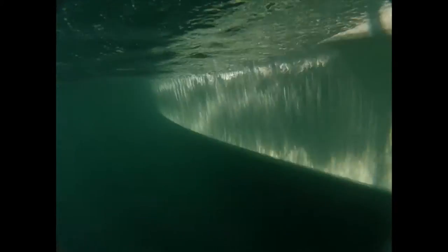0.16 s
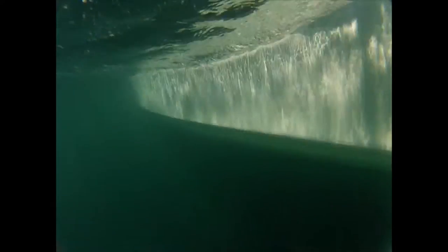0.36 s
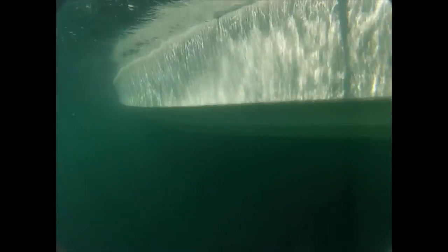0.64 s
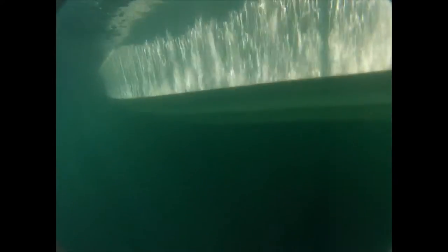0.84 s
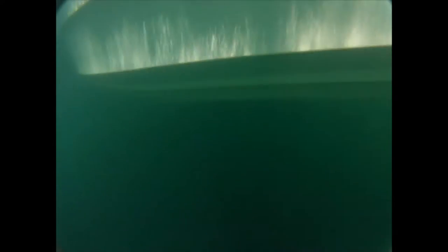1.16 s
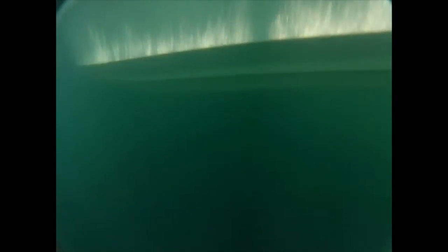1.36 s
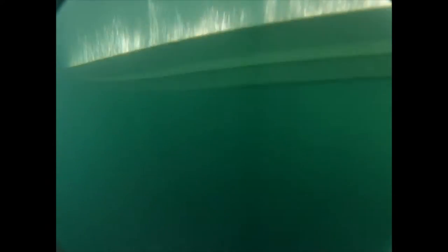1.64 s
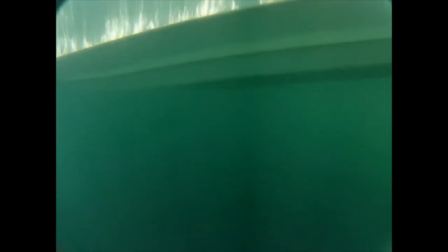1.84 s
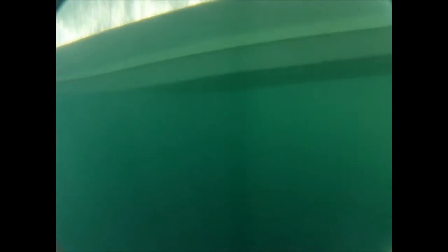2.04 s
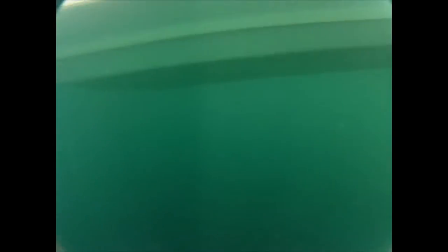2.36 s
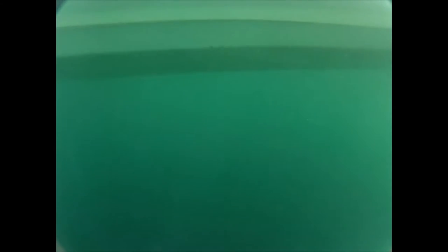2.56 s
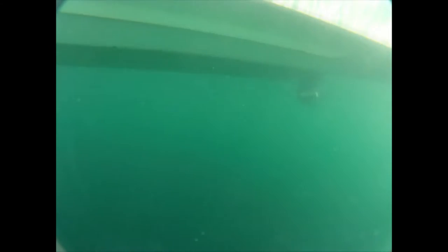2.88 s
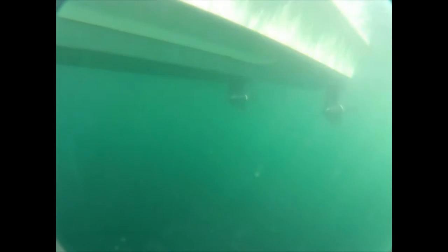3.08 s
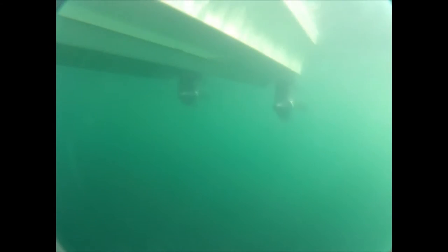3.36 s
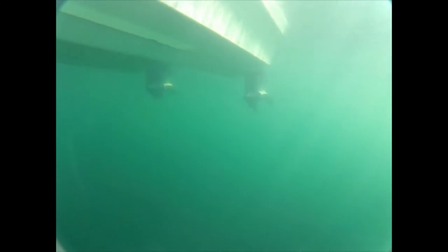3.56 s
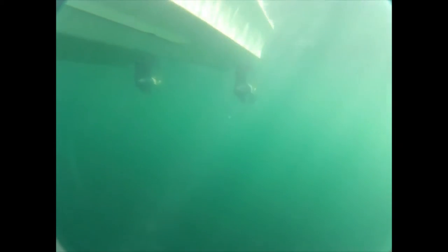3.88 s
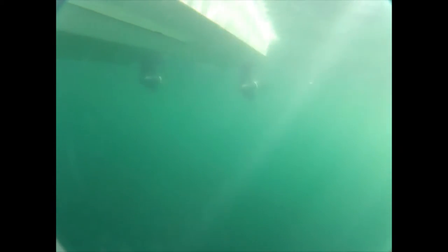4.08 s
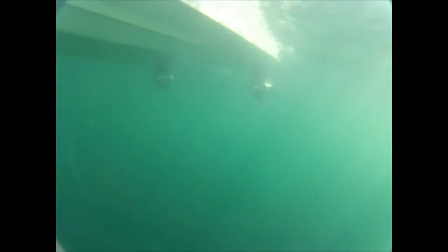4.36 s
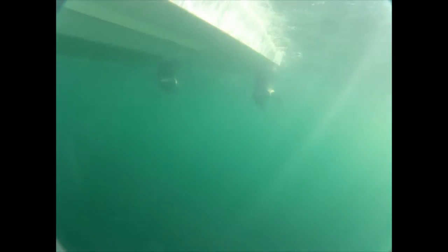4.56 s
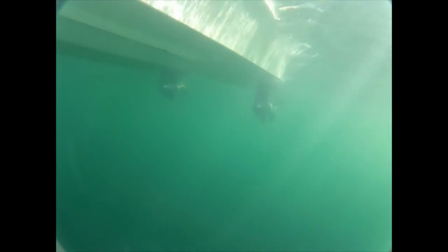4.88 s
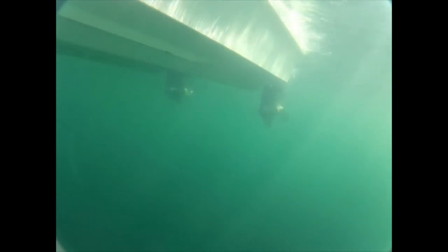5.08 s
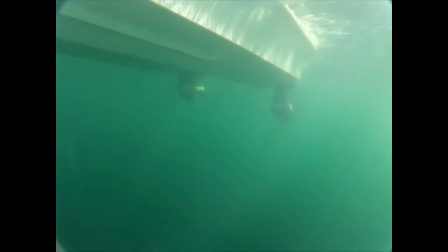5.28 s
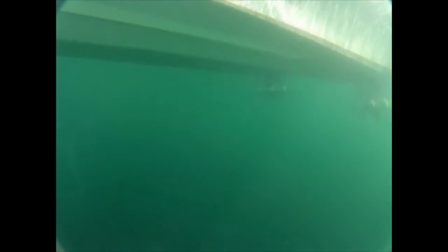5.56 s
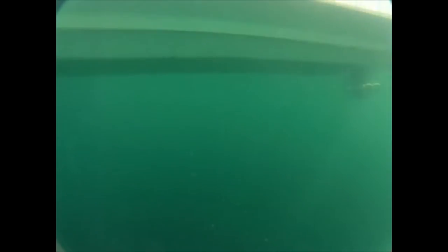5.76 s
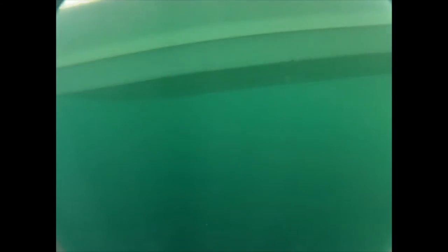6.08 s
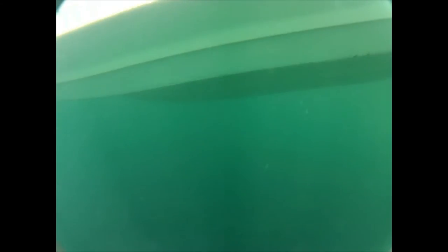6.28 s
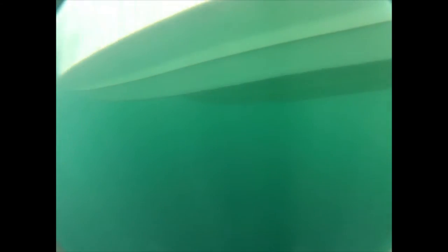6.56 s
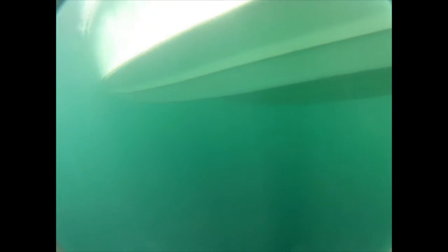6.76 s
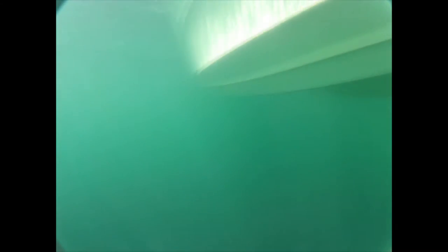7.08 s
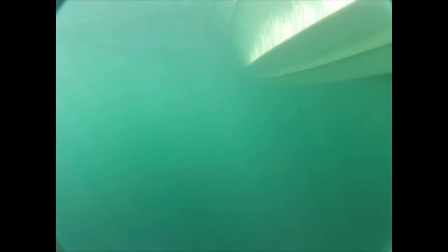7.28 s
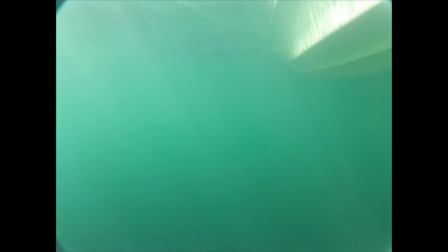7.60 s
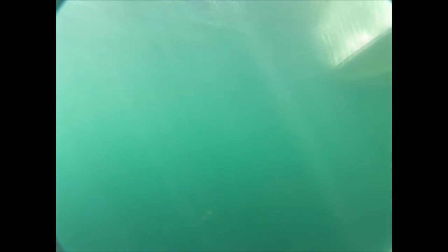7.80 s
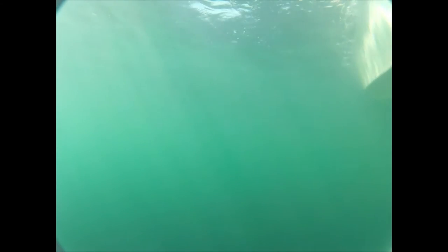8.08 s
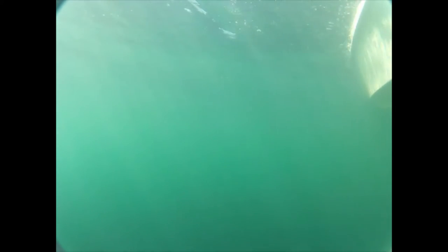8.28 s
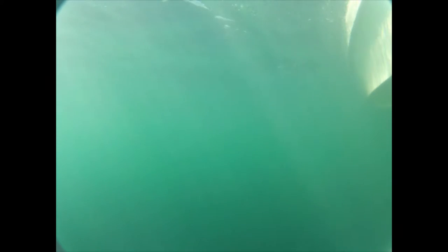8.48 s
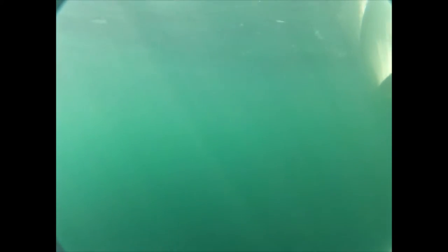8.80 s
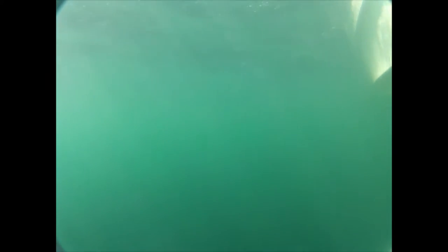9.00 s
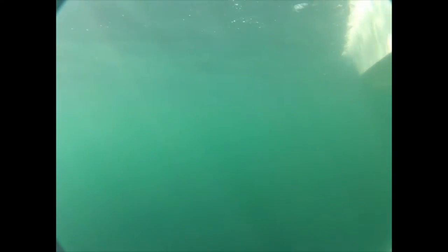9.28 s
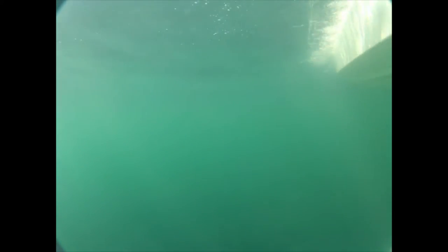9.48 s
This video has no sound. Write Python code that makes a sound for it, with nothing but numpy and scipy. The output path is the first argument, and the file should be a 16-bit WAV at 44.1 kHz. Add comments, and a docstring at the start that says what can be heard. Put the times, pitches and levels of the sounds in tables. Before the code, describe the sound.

Heard from inside a sealed waterproof case: a brief patter of spray, then a plunge with low glugs, knocks and a loud cluster of popping, chirping bubbles in the first second. After that, muffled water churns on the hollow case in uneven sloshes over low buffeting, with faint ticks from a loose mount. A second strong gulp comes near three seconds; later only scattered gurgles and soft surges remain.

```python
"""Spray pelts a waterproof camera housing, then it splashes under beside a moving boat and is dragged along.
Trapped air slaps, gulps and bubbles off it: falling throbs, knocks on the case and dying, gliding sines.
Then water churns on the hollow case as ringing grains of noise, with low buffeting, gurgles and fizz.
A loose part of the mount ticks, and the mount strums once. One microphone hears it all through the case;
the mono recorder mirrors the sound faintly around 12 kHz."""
import sys
import numpy as np
from scipy import signal
from scipy.io import wavfile

SR = 44100
rng = np.random.default_rng(int(sys.argv[2]) if len(sys.argv) > 2 else 0)


def generate_wav(sig):
    """Save sig (samples, or channels by samples) to the path in sys.argv[1] as 16-bit PCM at SR."""
    pcm = np.round(np.clip(np.atleast_2d(sig).T, -1, 1) * 32767).astype(np.int16)
    wavfile.write(sys.argv[1], SR, pcm)


N = 425124

# single bubbles leaving the case: (time [s], peak level [dB], pitch [Hz], 60 dB decay [s])
SINGLE_BUBBLES = [(.111, -19.5, 1290, 0.015), (.114, -22.5, 400, 0.13), (.181, -23.5, 2180, 0.022),
                  (.19, -18.5, 511, 0.076), (.187, -28, 1195, 0.058), (.301, -29, 3390, 0.015),
                  (.374, -18.5, 850, 0.022), (.626, -23.5, 1910, 0.018), (.674, -25.5, 1630, 0.035),
                  (.697, -27, 2080, .018), (.731, -28.5, 3030, 0.023), (.761, -8.5, 1260, 0.041),
                  (.777, -20, 2060, 0.013), (.792, -20.5, 2030, 0.015), (.831, -24, 2050, 0.012),
                  (.858, -18, 2080, 0.014), (.886, -17, 1900, 0.014), (0.9023, 1.5, 1204, 0.006),
                  (.908, -20, 1430, 0.026), (.938, -5, 1755, 0.028), (.965, -16, 4280, 0.0045),
                  (.969, -13, 2490, 0.012), (1.009, -32, 2400, 0.024), (1.039, -29, 1950, 0.038),
                  (1.129, -28, 1250, 0.0076), (1.768, -22, 2030, 0.0029), (1.88, -30.5, 1280, .02),
                  (1.881, -26.5, 608, 0.034), (2.654, -20.5, 546, 0.078), (2.767, -12, 576, 0.09),
                  (2.778, -7, 570, 0.059), (2.784, -28, 2050, 0.02), (2.853, -19, 620, 0.035),
                  (2.873, -32.5, 3580, 0.031), (3.471, -27.5, 860, 0.018), (3.471, -24, 2180, 0.0024),
                  (3.645, -22.5, 594, 0.05), (3.891, -32, 2150, 0.017), (4.402, -24.5, 607, 0.06),
                  (4.885, -37, 2170, 0.016), (5.175, -31.5, 2190, 0.01), (5.245, -33.5, 1440, 0.019),
                  (6.632, -33.5, 2174, 0.018), (6.657, -13, 565, 0.066), (8.284, -29, 2290, 0.021),
                  (8.393, -29, 545, 0.13)]
# large air pockets slapping shut on the case:
# (time [s], throb level [dB], final throb pitch [Hz], knock level [dB])
AIR_POCKETS = [(0.325, -24, 66.4, -29), (0.477, -13.5, 69, -20.5), (0.574, -10.5, 62, -10.5),
               (.608, -12.5, 61, -12), (.728, -11.5, 62.3, -8), (2.939, -5, 59.6, -8),
               (3.0408, -10.5, 54.6, -20), (3.0602, -11, 53.7, -21), (3.123, -14.5, 62, -30)]
BUBBLE_SWELL_CYCLES = 0.8   # a bubble takes part of a cycle to start ringing


def from_db(db):
    """Decibels to amplitude."""
    return 10 ** (np.asarray(db) / 20)


def rms_one(x):
    """Scale to rms 1."""
    return x / np.sqrt(np.mean(x ** 2) + 1e-20)


def in_time(rows):
    """The columns of a curve, at every sample."""
    s, *columns = np.transpose(rows)
    return [np.interp(np.arange(N) / SR, s, column) for column in columns]


def at_hz(colour, hz):
    """Gain of a colour at one frequency."""
    f, db = np.transpose(colour)
    return from_db(np.interp(np.log(hz), np.log(f), db))


def cut(x, hz, kind, order=2):
    """Butterworth filter."""
    sos = signal.butter(order, np.clip(hz, 10, 0.45 * SR), kind, fs=SR, output="sos")
    return signal.sosfilt(sos, x + 1e-18)


def drift(rate_hz):
    """Slow chance with spread 1: noise through two equal poles, made at every 40th sample."""
    r = np.exp(-80 * np.pi * rate_hz / SR)
    white = rng.standard_normal(N // 40 + 2002)
    slow = signal.lfilter([1], [1, -2 * r, r * r], white)[2000:]   # settled part only
    return np.interp(np.arange(N) / 40, np.arange(len(slow)), rms_one(slow))


def resonate(x, hz, width_hz):
    """A resonance with gain 1 on top."""
    r = np.exp(-np.pi * width_hz / SR)
    numerator = np.array([1, 0, -1]) * (1 - r * r) / 2
    return signal.lfilter(numerator, [1, -2 * r * np.cos(2 * np.pi * hz / SR), r * r], x + 1e-18)


def ping(hz, t60, rise=0, swell_cycles=0.1):
    """A dying sine that swells over some cycles and glides upward by rise [octaves/s]."""
    t = np.arange(int(1.5 * t60 * SR) + 2) / SR
    turns = np.cumsum(hz * 2 ** (rise * t)) / SR
    onset = 1 - np.exp(-turns / swell_cycles)
    return np.sin(2 * np.pi * turns) * from_db(-60 * t / t60) * onset


def add(track, s, sound):
    """Mix a sound in at a time."""
    i = int(np.clip(round(s * SR), 0, N - 1))
    track[i:i + len(sound)] += sound[:N - i]


def swell(start_s, length_s, attack_s, release_s):
    """Attack, hold and release of one event, at every sample."""
    out = np.zeros(N)
    t = np.arange(int((length_s + 8 * release_s) * SR)) / SR
    release = np.exp(-np.maximum(t - length_s, 0) / release_s)
    add(out, start_s, (1 - np.exp(-t / attack_s)) * release)
    return out


def surges(per_s=45, fade_s=0.0066, spread_db=11.5, calm=0.14):
    """Water lets go in little spurts that start at once and fade."""
    sizes = rng.random(N) < per_s / SR
    kicks = sizes * from_db(spread_db * np.clip(rng.standard_normal(N), -2, 2))
    return calm + signal.lfilter([1], [1, -np.exp(-1 / (fade_s * SR))], kicks + 1e-18)


def grains(colour, per_s, spread_db, sharpness, clumping, count=20):
    """Random collapses, in spurts, each ringing briefly at one of many pitches; rms 1."""
    at = np.flatnonzero(rng.random(N) < per_s / SR)
    sizes = from_db(spread_db * np.minimum(rng.exponential(1, len(at)), np.pi))
    sizes = sizes * surges()[at] ** clumping * rng.choice([-1, 1], len(at))
    dealt = rng.integers(0, count, len(at))   # the pitch that each collapse gets
    out = np.zeros(N)
    for k, hz in enumerate(np.geomspace(colour[0][0], colour[-1][0], count)):
        clicks = np.zeros(N)
        clicks[at[dealt == k]] = sizes[dealt == k]
        ringing = resonate(resonate(clicks, hz, hz / sharpness), hz, hz / 2)
        out += at_hz(colour, hz) * np.sqrt(hz) * rms_one(ringing)   # sqrt: bands widen with pitch
    return rms_one(out)


def smooth_noise(colour, count=8):
    """Even noise in adjoining bands; rms 1."""
    edges = np.geomspace(colour[0][0], colour[-1][0], count + 1)
    out = np.zeros(N)
    for lo, hi in zip(edges, edges[1:]):
        band = cut(rng.standard_normal(N), [lo, hi], "band")
        out += at_hz(colour, np.sqrt(lo * hi)) * band
    return rms_one(out)


def housing(x, boom):
    """The air in the case booms with whatever pushes on its walls; water pressure wavers its pitch."""
    air_hz, width_hz, wander_hz, wanders_per_s = 570, 33, 29.4, 5.6
    hz = air_hz + wander_hz * drift(wanders_per_s)[:len(x)]
    turning = np.exp(2j * np.pi * np.cumsum(hz) / SR)
    r = np.exp(-np.pi * width_hz / SR)
    # shift the wavering pitch down to zero, low-pass there, and shift back
    boomed = turning * signal.lfilter([1 - r], [1, -r], x / turning)
    return x + boom * 2 * np.real(boomed)


def bubbles():
    """Each bubble pinches off and rings at the pitch of its size; near the surface the pitch glides upward."""
    out = np.zeros(N)
    for s, db, hz, t60 in SINGLE_BUBBLES:
        octaves_per_s = 7 * np.exp(-s / 1.3)   # the glide fades as the camera sinks
        tone = ping(hz, t60, octaves_per_s, swell_cycles=BUBBLE_SWELL_CYCLES)
        add(out, s, from_db(db) * tone / np.abs(tone).max())
    # the wall of a loud bubble swings unevenly
    return out + 0.027 * cut(out ** 2, 1800, "high")


def slaps():
    """A pocket of air shuts with a knock on the case; a large one then glugs, falling to a low throb."""
    # ringing of the case under a blow: (pitch [Hz], relative level [dB], 60 dB decay [s])
    case_modes = [(356, -2, 0.017), (570, 1, 0.022), (782, -8, 0.015)]
    # small pockets that only knock: (time [s], level [dB])
    small_pockets = [(2.507, -26), (2.526, -30), (2.549, -25), (2.578, -25.5), (2.906, -17.5), (3.017, -21)]
    throb_t60_s, drop_hz, drop_s = 0.19, 400, 0.003   # a throb starts high and falls as the pocket spreads
    out, t = np.zeros(N), np.arange(SR // 4) / SR
    for s, db, hz, _ in AIR_POCKETS:
        turns = hz * t + drop_hz * drop_s * (1 - np.exp(-t / drop_s))
        onset = 1 - np.exp(-2 * turns)
        add(out, s, from_db(db - 60 * t / throb_t60_s) * np.sin(2 * np.pi * turns) * onset)
    blows = [(s, knock_db) for s, _, _, knock_db in AIR_POCKETS] + list(small_pockets)
    chances_db = rng.standard_normal((len(blows), len(case_modes)))   # no two blows ring alike
    for (s, db), chance_db in zip(blows, chances_db):
        for (mode_hz, mode_db, t60), luck_db in zip(case_modes, chance_db):
            add(out, s, -from_db(db + mode_db + luck_db) * ping(mode_hz, t60, swell_cycles=0.27))
    return cut(out, 900, "low", order=3)   # water cushions the blow


def shower(count=100):
    """Small bubbles dragged down by the dive chirp in a crowd that thickens quickly and then thins out."""
    start_s, peak_s, end_s = 0.59, 0.65, 1.17
    level_db, spread_db = -37, 4
    middle_hz, spread_octaves, ring_cycles = 2150, 0.5, 26   # ring_cycles: until 60 dB down, before the glide
    out = np.zeros(N)
    times = rng.triangular(start_s, peak_s, end_s, count)
    chances = np.clip(rng.standard_normal((count, 2)), -2, 2)
    for s, (size, luck) in zip(times, chances):
        hz = middle_hz * 2 ** (spread_octaves * size)
        chirp = ping(hz, ring_cycles / hz, rise=5, swell_cycles=BUBBLE_SWELL_CYCLES)
        add(out, s, from_db(level_db + spread_db * luck) * chirp)
    return out


def spray(spraying):
    """Drops pelt the case as it meets the surface."""
    # colour of the spray: (frequency [Hz], relative level [dB])
    drop_colour = [(300, -5.5), (700, -8.5), (1300, -3.5), (1900, -1), (2800, -6), (3600, -3.5),
                   (5200, -15)]
    return spraying * grains(drop_colour, per_s=4600, spread_db=0.5, sharpness=3.2, clumping=0.35, count=14)


def water_motion():
    """Gains of buffet, churn, fizz, far fizz and spray: the current keeps up a wash, sloshes stir it."""
    # current on the case, as its low buffeting: (time [s], relative level [dB])
    current_curve = [(0, -43.5), (.5, -40.5), (.6, -36.5), (.88, -36), (1.3, -38), (2.3, -43), (2.4, -32),
                     (2.66, -38.5), (3, -23.5), (3.28, -37.5), (5.88, -44), (6.26, -55.5), (6.32, -32.5),
                     (7.2, -42.5), (7.28, -26.5), (7.5, -37), (8.44, -43.5), (8.5, -32.5), (8.78, -28),
                     (9.14, -44.5), (9.2, -33), (9.64, -36.5)]
    # wavelets sloshing over the case: (start [s], length [s], churn level [dB], fizz level [dB])
    wavelets = [(0.092, 0.094, -53, -48), (0.228, 0.16, -46.5, -51.5), (0.588, 0.08, -25.5, -40.5),
                (0.684, 0.11, -33.5, -37), (0.856, 0.12, -38, -40.5), (1.009, 0.17, -42, -47),
                (1.41, 0.072, -40.5, -49.5), (1.911, 0.03, -41, -55), (2.15, 0.17, -37, -54.5),
                (2.637, 0.021, -32, -35.5), (2.749, 0.18, -31, -48), (3.878, 0.061, -35.5, -47.5),
                (4.252, 0.036, -26, -42), (4.346, .11, -38, -66), (4.819, 0.14, -36, -49),
                (5.133, 0.15, -40, -56), (5.427, 0.022, -34.5, -52.5), (5.737, 0.097, -41.5, -62.5),
                (6.437, 0.055, -38.5, -70), (6.578, 0.059, -36.5, -48), (6.714, 0.026, -23.5, -38),
                (6.885, 0.17, -41, -66), (7.152, 0.093, -38.5, -58), (7.247, 0.13, -37, -54.5),
                (8.261, 0.096, -35, -59), (8.503, 0.12, -41, -54.5), (8.685, 0.088, -34.5, -52.5),
                (9.148, 0.11, -34, -53.5), (9.296, 0.075, -33, -48.5), (9.4, 0.14, -39, -61.5),
                (9.595, 0.037, -34.5, -55)]
    # spray on the case before it goes under: (start [s], length [s], level [dB])
    splats = [(0, 0.0049, -17), (0.013, 0.045, -26.5), (0.046, 0.0065, -19.5), (0.066, 0.0041, -20.5),
              (0.081, 0.0036, -28)]
    current_db, = in_time(current_curve)
    # the wash takes a share of the current's swing and has a rise and fall [dB] of its own
    wash_db = 0.4 * (current_db - current_db.mean()) + 3.5 * drift(2.7)
    churning, fizzing, spraying = np.zeros(N), np.zeros(N), np.zeros(N)
    attack_s = 0.011
    for s, length, churn_db, fizz_db in wavelets:
        release_s = 0.022 + 0.12 * length   # a longer slosh drains more slowly
        churning += from_db(churn_db) * swell(s, length, attack_s, release_s)
        fizzing += from_db(fizz_db) * swell(s, length, attack_s, 0.6 * release_s)   # fizz clears sooner
    for s, length, db in splats:
        spraying += from_db(db) * swell(s, length, attack_s=0.0013, release_s=0.005)
    # sloshes and spray push on the case too
    stirring = from_db(-8) * churning + from_db(-0.5) * spraying
    pushing = np.hypot(stirring, from_db(current_db - 2.5))
    churning = np.hypot(churning, from_db(-48.5 + wash_db))
    washing = from_db(-62.5 + 0.4 * wash_db)   # the fizz of the wash swings less
    return pushing, churning, fizzing, washing, spraying


def flow(pushing, churning, shield_db=-8, shield_s=0.0037):
    """Big eddies buffet the case, smaller ones churn on it, and the mount strums."""
    # colours of the low buffeting and of the churn: (frequency [Hz], relative level [dB])
    buffet_colour = [(18, -12.5), (30, -1.5), (52, 1), (75, -8), (110, -11), (160, -28)]
    churn_colour = [(100, 4), (180, 4), (260, 3.5), (350, 1), (440, -4.5), (540, -2.5), (630, 0), (760, -8),
                    (950, -28)]
    # a pocket of air keeps the moving water off the case around the moment that it shuts
    t = np.arange(N) / SR
    covers = [np.exp(-((t - s - shield_s / 2) / shield_s) ** 2) for s, *_ in AIR_POCKETS]
    wetted = from_db(shield_db * np.max(covers, axis=0))
    buffet = pushing * from_db(2 * drift(13.0)) * smooth_noise(buffet_colour, count=6)
    collapses = grains(churn_colour, per_s=900, spread_db=2.4, sharpness=17.8, clumping=0.43)
    churn = churning * rms_one(housing(collapses, boom=1.7))
    # the mount strums once, while the current is strong
    strumming = swell(start_s=8.46, length_s=0.43, attack_s=0.038, release_s=0.076)
    hum = resonate(resonate(rng.standard_normal(N), 174.5, 7.8), 190, 30)
    strum = from_db(-42) * strumming * rms_one(hum)
    return wetted * (buffet + churn) + strum


def eddies():
    """An eddy bursts on the case as a short, lumpy gurgle with a bright edge."""
    # bursts: (time [s], level [dB], centre [Hz], length [s])
    bursts = [(2.825, -30.5, 607, 0.086), (2.933, -18, 600, 0.011), (2.992, -29, 604, 0.052),
              (4.263, -26, 277, 0.026), (4.777, -33.5, 325, 0.027), (4.431, -31.5, 403, 0.0092),
              (6.317, -25.5, 195, 0.031), (6.72, -32.5, 536, 0.023), (6.787, -36, 182, 0.087),
              (7.353, -35.5, 274, 0.052), (8.022, -34, 285, 0.021), (8.278, -30, 264, 0.028),
              (8.699, -32.5, 455, 0.021), (9.322, -34.5, 390, 0.032)]
    out, t = np.zeros(N), np.arange(SR // 4) / SR
    noises = rng.standard_normal((len(bursts), 2, len(t)))
    for (s, db, hz, length), white in zip(bursts, noises):
        envelope = (1 - np.exp(-t / 0.0027)) * np.exp(-(t / length) ** 1.42)
        lumps = white * (np.abs(white) > 2)   # only the strongest pushes count
        gurgle = housing(cut(resonate(lumps[0], hz, 0.39 * hz), 590, "low", order=4), boom=1.0)
        edge = resonate(resonate(lumps[1], 1970, 480), 1270, 1330)
        burst = envelope * (rms_one(gurgle) + from_db(-33.0) * rms_one(edge))
        loudness = np.sqrt(np.sum(burst ** 2) / (length * SR))
        add(out, s, from_db(db) * burst / loudness)
    return out


def fizz(fizzing, washing, wake_db=-28, surface_db=9, wake_s=0.0059):
    """Fine bubbles drift past in clouds; each large bubble sheds a few more, most near the surface."""
    # colour of the fizz: (frequency [Hz], relative level [dB])
    fizz_colour = [(900, 2), (1150, 2), (1450, -9), (1800, 0.5), (2200, 4.5), (2700, -14.5), (3200, -10.5),
                   (3650, -6), (4200, -41.5), (5200, -24.5)]
    shed, t = np.zeros(N), np.arange(SR // 8) / SR
    for s, db, _, _ in SINGLE_BUBBLES:
        shed_db = min(db, -20) + wake_db + surface_db * np.exp(-s / 2)
        add(shed, s, from_db(shed_db) * np.exp(-t / wake_s))
    # the nearest bubbles ring one by one, the far ones merge into a wash
    near = grains(fizz_colour, per_s=1100, spread_db=2.0, sharpness=37, clumping=0.63, count=30)
    far = smooth_noise(fizz_colour, count=14)
    clouds = 0.58 * near + 0.49 * rms_one(surges() * far)
    return (fizzing + 0.5 * washing) * clouds + (shed + 0.56 * washing) * far


def ticks(first_gap=0.0094, rebound=0.93, loss_db=8.5, count=4):
    """A loose part of the mount strikes the case and bounces, each bounce sooner and weaker."""
    # strikes: (time [s], relative level [dB])
    strikes = [(0.6947, -47), (1.169, -48), (1.3861, -53), (1.4716, -53), (1.553, -50), (1.7058, -48),
               (1.8156, -54), (1.965, -56.5), (2.05, -54), (2.3082, -50.5), (2.575, -49.5), (2.8843, -52),
               (2.995, -48.5), (3.052, -48), (3.1493, -47), (3.2357, -48), (3.3268, -46.5), (3.414, -45.5),
               (3.4876, -48.5), (3.6099, -48.5), (3.6945, -54.5), (3.7928, -52.5), (4.152, -52.5),
               (4.3328, -54), (4.4216, -50.5), (4.512, -57.5), (4.592, -56.5), (4.693, -58.5),
               (4.7613, -52.5), (5.01, -59), (5.081, -51), (5.1575, -48.5), (5.606, -48.5), (5.703, -58.5),
               (5.795, -58.5), (5.848, -58.5), (5.929, -59), (6.013, -54), (6.0384, -54), (6.108, -51),
               (6.1232, -53), (6.2157, -54), (7.0064, -56), (7.082, -48.5), (7.1516, -49), (7.3234, -51.5)]
    # ringing under a strike: (pitch [Hz], relative level [dB], 60 dB decay [s])
    tick_modes = [(1460, 7, 0.0058), (2480, 8, 0.0073), (3520, 3.5, 0.0071), (4900, -1.5, 0.0057)]
    clicks = np.zeros(N)
    for (s, db), chance in zip(strikes, rng.standard_normal((len(strikes), count))):
        gap, when = first_gap * np.exp(0.054 * chance[0]), s + 0.001423
        for k in range(count):
            luck_db = chance[k] * (k > 0)   # only the bounces vary in level
            add(clicks, when, from_db([db + 8.5 - k * loss_db + luck_db]))
            when, gap = when + gap, gap * rebound
    knock = np.zeros(N)
    for k, (hz, db, t60) in enumerate(tick_modes):
        knock += (-1) ** k * from_db(db) * signal.lfilter(ping(hz, t60), [1], clicks)
    return knock


def hiss():
    """A steady, even noise lies under everything."""
    # colour of the hiss: (frequency [Hz], relative level [dB])
    hiss_colour = [(700, -11), (2500, -6.5), (5200, -10.5)]
    return from_db(-69.5) * smooth_noise(hiss_colour, count=5)


def scene():
    """Everything reaches one microphone through the case."""
    pushing, churning, fizzing, washing, spraying = water_motion()
    air = bubbles() + slaps() + shower()
    water = spray(spraying) + flow(pushing, churning) + eddies() + fizz(fizzing, washing)
    sound = air + water + ticks() + hiss()
    return np.array([sound, sound])


def record(dry):
    """The recorder rounds high peaks, keeps the band under 6 kHz and mirrors its slope around 12 kHz."""
    full_scale, mirror_hz = 0.85, 12000
    rounded = full_scale * np.tanh(dry / full_scale)
    band = cut(rounded, 5640, "low", order=12)
    carrier = np.cos(2 * np.pi * mirror_hz * np.arange(N) / SR)
    mirror = 1.52 * np.diff(band, prepend=0) * carrier
    sound = band + cut(mirror, 14300, "low", order=8)
    return cut(sound, 15800, "low", order=16)   # the top is cut


dry = scene()
out = record(dry)
generate_wav(out)
```